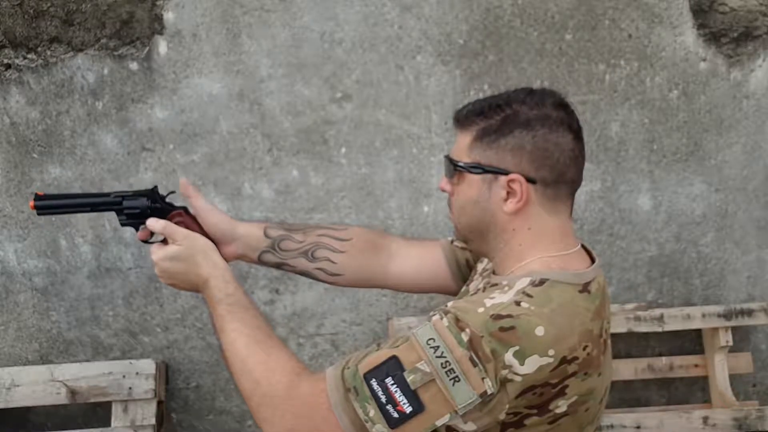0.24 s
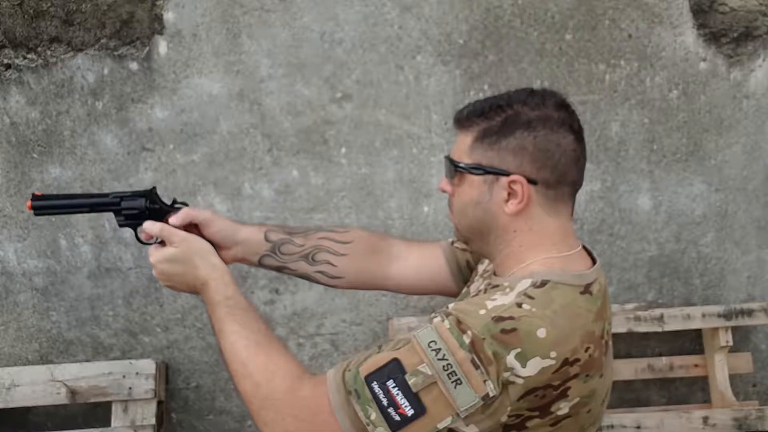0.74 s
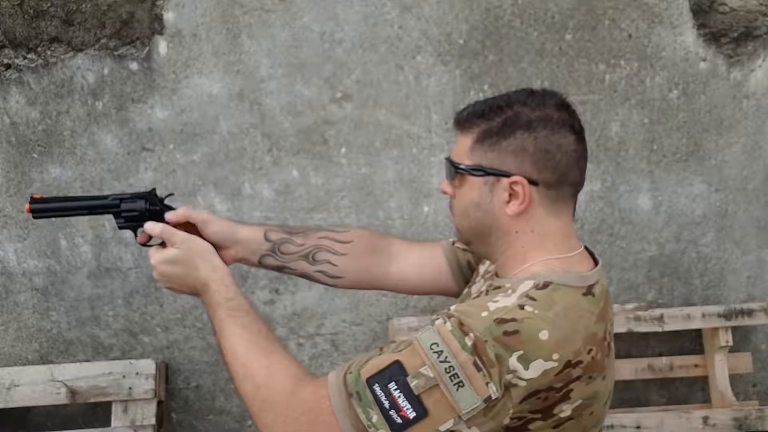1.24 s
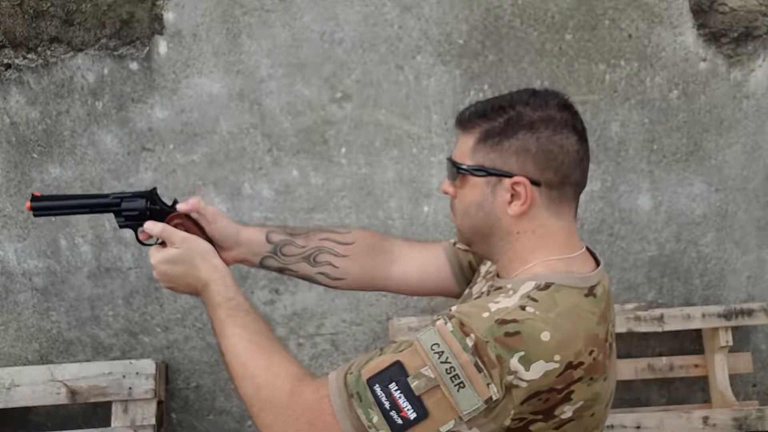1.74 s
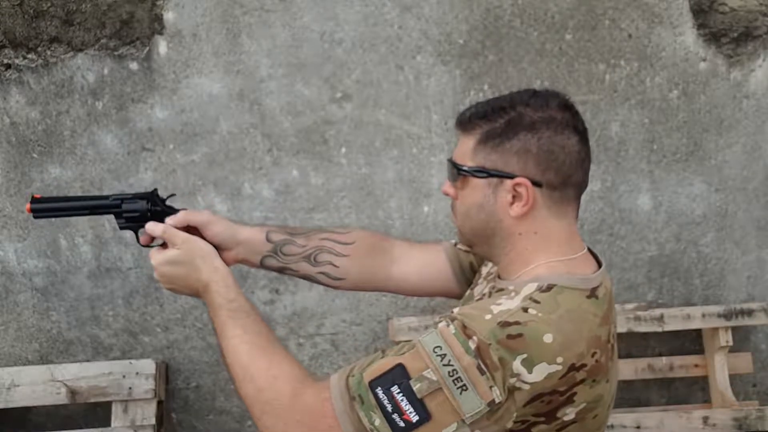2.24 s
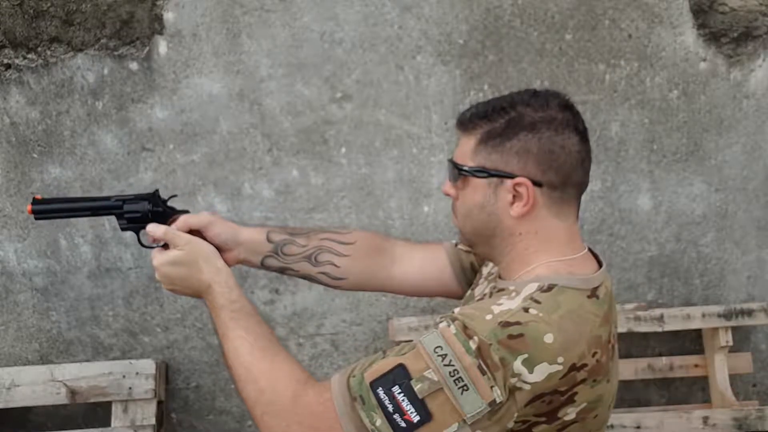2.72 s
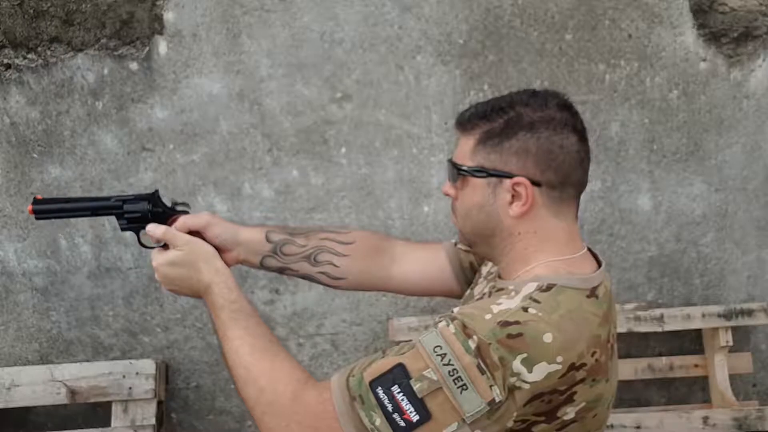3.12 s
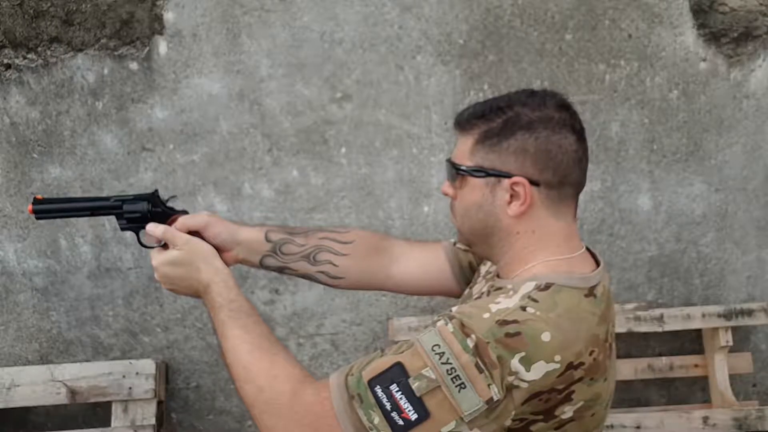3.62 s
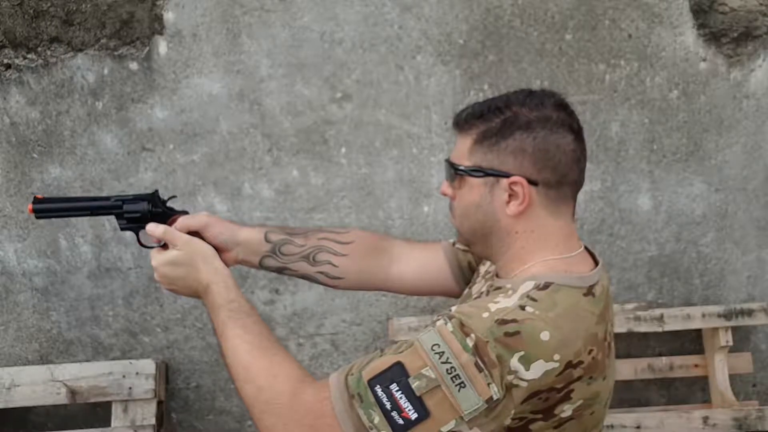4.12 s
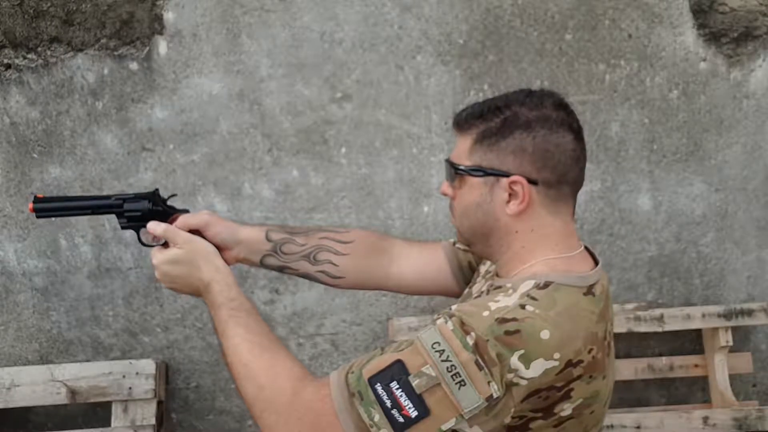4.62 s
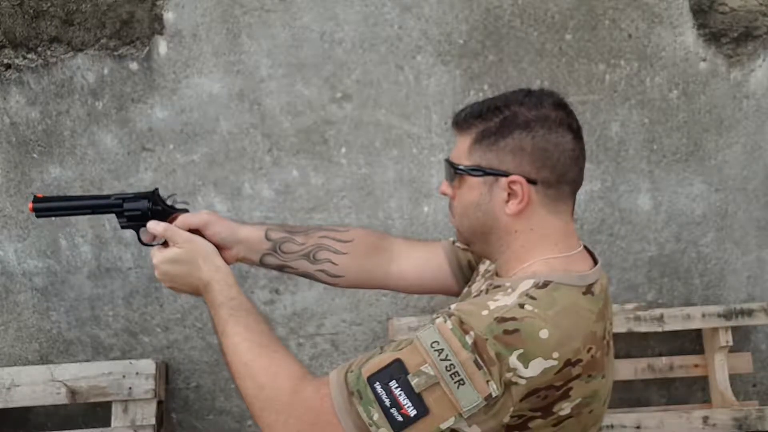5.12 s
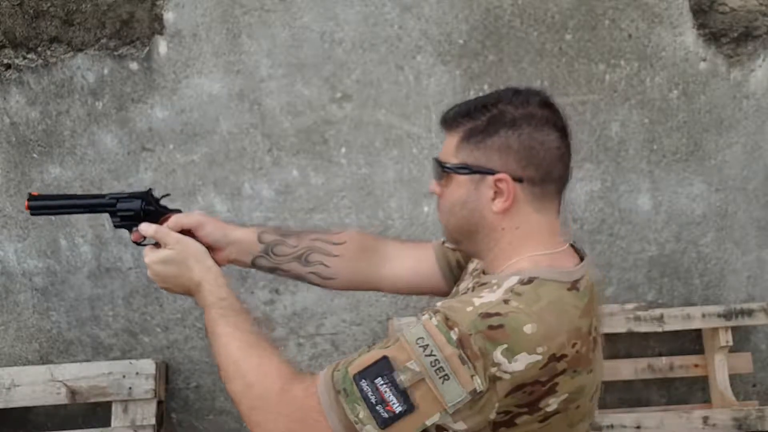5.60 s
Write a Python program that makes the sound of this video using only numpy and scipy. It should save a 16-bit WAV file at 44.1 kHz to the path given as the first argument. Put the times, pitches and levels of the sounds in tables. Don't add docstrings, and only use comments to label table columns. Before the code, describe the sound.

In a hard-walled yard, heard close in stereo, a shot's tail is already ringing as its pellet cracks on a hollow board at 0.01 s, the board rattling and humming; the spent pellet ticks on concrete. Steel clicks and a short slide at 0.35 s draw the hammer. Loaded gas shots snap at about 1.07, 2.06, 2.56 and 3.2 s, each followed roughly 0.09 s later by a woody board smack, some softer, the last strong. Small bounces follow at 1.25 and 2.26 s. Empty shots then come faster, at 3.65, 4.14, 4.53, 4.9 and 5.21 s: hammer crack, gas burst, ringing barrel and frame, short wall echoes, no board hit. Trigger take-up, cylinder lock and reset clicks fill the gaps until 5.37 s. Behind lie low distant traffic, a faint engine hum from 0.7 to 2 s, a lorry's rumble around 4.3 s and very faint cricket chirps after 5.5 s.

```python
import sys
import numpy as np
from scipy import signal
from scipy.fft import rfft, irfft, next_fast_len
from scipy.io import wavfile
from scipy.ndimage import uniform_filter1d

SR = 44100
rng = np.random.default_rng(int(sys.argv[2]) if len(sys.argv) > 2 else 0)


def level_to_linear(level):
    exponent = np.asarray(level, float) / 20
    return 10 ** exponent


def wav_out(sig):
    wavfile.write(sys.argv[1], SR, np.round(np.clip(np.atleast_2d(sig).T, -1, 1) * 32767).astype(np.int16))


N = 258426

LEAD = SR // 5
SIZE = next_fast_len(N + LEAD + SR)
HZ = np.maximum(np.arange(SIZE // 2 + 1) * SR / SIZE, 1)
TIME = (np.arange(SIZE) - LEAD) / SR

SHOT_START = [-.0775, 1.0716, 2.0617, 2.5570, 3.2019, 3.6545, 4.1409, 4.5309, 4.9041, 5.2139]
# crack_peak, muzzle_puff_peak, thump_peak, jet_db, room_db
SHOTS = [
    (0.46, 0.43, 0.18, -20.5, -4),
    (0.4, 0.52, 0.35, -25, -14.5),
    (0.42, 0.12, 0.41, -21.5, -14.5),
    (0.17, 0.27, 0.63, -17, -15.5),
    (0.25, .56, 0.23, -14, -17),
    (0.35, .0, 0.11, -19.5, -18.5),
    (0.24, 0.019, 0.13, -16, -18),
    (0.31, 0.034, 0.18, -12.5, -16),
    (0.57, 0, 0.14, -15, -16),
    (0.36, 0.05, 0.16, -14, -15.5),
]
# freq_hz, level_db [dB per Hz]
JET = [(88, -31), (150, -10), (244, 0), (837, -8.5), (960, -8), (1360, -10.5), (1480, -10), (2180, -5.5),
       (3040, -8.5), (5150, -8.5), (9260, -9), (13400, -9), (16000, -14.5)]
# freq_hz, gain_db
PELLET_TAIL = [(100, -6), (250, -6), (400, -1.5), (680, -7.5), (1100, -0.5), (2000, 1), (8000, 0),
               (16000, 1)]
# freq_hz, loaded_db, empty_db, t60_s
BARREL = [(362, -20, -42, .09), (470, -23.5, -33.5, 0.089), (596, -39, -29.5, .12), (807, -34.5, -34, 0.13),
          (1102, -27, -32.5, 0.22), (1380, -33.5, -31, 0.077), (1595, -37, -31, 0.12),
          (1710, -23.5, -35, .08), (2080, -22, -32, .07), (2093, -32, -21.5, 0.11), (3800, -23, -36, 0.052),
          (5230, -31, -29.5, 0.064), (6360, -30, -34, .08)]
# freq_hz, level_db, t60_s
FRAME = [(261, -31, 0.25), (492, -35.5, 0.11), (658, -30.5, 0.08), (963, -23, 0.091), (4030, -24.5, 0.037),
         (5300, -27, 0.063), (6250, -38.5, 0.041), (7420, -24.5, 0.11), (10580, -32, 0.072),
         (10960, -31.5, 0.035), (13000, -29, .1), (13600, -32, .08)]
# delay_ms, level_db
GROUND = (6.6, -2.5)
# delay_ms, level_db
WALLS = [(12.2, -11), (31.8, -14), (33.2, -13), (34.6, -14), (58.0, -20)]
# freq_hz, t60_s
YARD_T60 = [(100, 0.74), (260, 0.3), (700, 0.27), (1840, 0.29), (4850, 0.25), (12800, 0.15)]
# freq_hz, correlation [-1 to 1]
LIKENESS = [(30, 1), (120, 0.96), (290, 0.93), (640, 0.41), (1400, -.15), (3000, -0.031)]

HIT_START = [.0131, 1.1615, 2.1551, 2.6473, 3.2926]
# crack_peak, blow_db, first_modes_db, second_modes_db, panel_modes_db
HITS = [
    (1, -11.5, -13.5, -9, -12),
    (0.39, -13.5, -24.5, -13, -19),
    (0.26, -14.5, -17.5, -14, -16),
    (0.77, -16, -39, -25.5, -16),
    (0.96, -16.5, -18, -21, -14.5),
]
# freq_hz, level_db [dB per Hz]
RATTLE = [(120, -32), (250, -8), (420, -3.5), (790, -2), (1120, -3), (1630, -7), (1940, -4.5),
          (4670, -12.5), (7400, -15), (8900, -21.5), (12000, -26), (16000, -28)]
# freq_hz, level_db, t60_s
BOARD = [(189.5, 2.5, .25), (185.2, -7.5, 0.51), (232.4, 4.5, 0.15), (132, -5, 0.32), (340.1, -7.5, 0.32),
         (372, -7, 0.25), (453.7, -7, 0.21), (649, -10.5, 0.21), (1090, -5.5, .2), (1120, -9, .18),
         (794, -1.5, 0.26), (843, -5, .15)]

# start_s, dull_db, bright_db, top_db, length_ms
BOUNCES = [
    (.054, -25.5, -28.5, -34.5, 3.0),
    (.11, -58, -34, -46, 3.2),
    (1.254, -60, -36.5, -40, 1.3),
    (2.263, -67.5, -39, -42.5, 1.7),
]
# start_s, level_db, brightness_db
TICKS = [(0.0211, -15, -3.5), (0.3, -54, -4), (0.3262, -45.5, -3), (0.5422, -58, -5.5), (0.6134, -67.5, -3),
         (.715, -63.5, -0.5), (1.4492, -47.5, -7), (1.676, -68.5, -12), (1.938, -43.5, 1.5),
         (1.954, -47, 4.5), (2.4901, -53.5, -9), (3.136, -47, -3.5), (4.322, -48, -5.5),
         (4.4756, -43.5, -8.5), (4.8196, -47.5, -2), (5.63, -72.5, -4)]
# take_up_s, hand_s, cylinder_lock_s
PULL_TIMES = [(.3383, .3565, .374), (1.46, 1.478, 1.496), (2.466, 2.486, 2.514), (3.0988, 3.1232, 3.152),
              (3.5694, 3.5922, 3.6094), (4.068, 4.0868, 4.106), (4.4385, 4.4615, 4.483),
              (4.8091, 4.838, 4.857), (5.1498, 5.1667, 5.184)]
# effort_db, take_up_db [over effort], lock_db [over effort]
PULL_LEVELS = [(1.5, 4.5, 2), (-0.5, 4, 3), (-3, 1, -2.5), (-8.5, 1.5, -0.5), (-4, -2, 3),
               (-4.5, -0.5, 6.5), (-0.5, -0.5, 1), (-1, -2, 5.5), (-1, 4, 7.5)]
# start_s, level_db, brightness_db
SEARS = [
    (1.052, -11.5, -8.5),
    (2.045, -6, -3.5),
    (2.5414, 2.5, 5.5),
    (3.1859, -3.5, 2),
    (3.6392, -4, -2),
    (4.1224, -3.5, 1.5),
    (4.5149, 4, 2),
    (4.8874, 3.5, -2.5),
]
# second_click_s, level_db, first_click_db [over second]
RESETS = [(3.8344, -3.5, -9), (4.3178, -2.5, -3), (4.6893, 0, -3), (5.05, 0.5, -5), (5.3696, 1, -3.5)]
# freq_hz, level_db [dB per Hz]
STEEL_LOW = [(500, -27.5), (800, -11), (1000, -4), (1150, -11.5), (1500, -6), (2100, -3), (3500, -5),
             (4500, -35.5)]
# freq_hz, level_db [dB per Hz]
STEEL_HIGH = [(2800, -25.5), (4000, -2.5), (5500, -3.5), (7300, 5.5), (8200, -1), (9200, -3), (11000, -39)]
# freq_hz, level_db [dB per Hz]
STEEL_TOP = [(7000, -36), (9000, -0.5), (10500, -3.5), (13300, 1), (16000, -5), (18000, -15)]
# dull_db, bright_db, top_db
TAKE_UP, HAND, LOCK = (-53, -44, -51), (-39.5, -43, -38.5), (-36, -35, -38)
RESET, SEAR, TICK = (-41, -38.5, -41.5), (-39, -39, -42.5), (0, 0.97, -3)

# freq_hz, level_db [dB per Hz]
TRAFFIC = [(25, -26), (60, -5.5), (100, 0.5), (150, -0.5), (300, -5.5), (600, -10.5), (1000, -14),
           (2200, -26), (4000, -44.5), (8000, -46.5), (12500, -49.5), (14000, -65.5)]
# start_s, level_db
TRAFFIC_LEVEL = [(0, -51), (.45, -56), (.7, -54.5), (1.6, -55.5), (2.5, -54), (3.1, -58), (3.6, -55.5),
                 (3.95, -57), (4.4, -54.5), (5.0, -51), (5.5, -53), (5.65, -51.5), (5.86, -51.5)]
# start_s, pitch_hz, level_db
ENGINE = [
    (.5, 86, -79),
    (.7, 90.2, -60),
    (1.0, 95, -61),
    (1.3, 95, -53),
    (1.45, 94.1, -61.5),
    (1.65, 92.8, -50.5),
    (1.9, 93.5, -59),
    (2.05, 97, -70),
]
# loudest_s, pitch_hz, level_db
CREAKS = [
    (1.93, 665, -60),
    (3.05, 601, -64),
    (3.07, 792, -67),
]
# loudest_s, level_db
CRICKET = [
    (5.53, -84),
    (5.591, -81),
    (5.71, -71),
    (5.83, -74),
]
# freq_hz, gain_db
MICROPHONE = [(20, -16.5), (60, -14), (120, 0), (8000, 2.5), (8900, -4.5), (10000, 1), (15700, 4),
              (16300, -29), (18000, -39)]

LOADED = 5
SAME_YARD = .7
GUN_LAG_MS, BOARD_LAG_MS = 0.1904, 0.436
BOARD_LUMPY_DB, MIDDLE_DB = 4.5, -3
TOUCH_MS, TOUCH_DB, TOUCH_ROOM_DB, TOUCH_LUMPY_DB = 1.4, 11, -4, 6
RESET_GAP_MS = 29.5
SEAR_SLIP_MS, SEAR_SLIP_DB = 4.3, -9
SLIDE_DB, SLIDE_LEAD_MS, SLIDE_TAIL_MS, SLIDE_SWELL_DB = -64, 13, 30, -3
RUMBLE_DB, LORRY_S, LORRY_WIDTH_S, LORRY_DB = -71, 4.3, 0.8, 9
CREAK_RISE_S, CREAK_FALL_S, CREAK_EDGE_DB = .05, .11, -10.5
CRICKET_HZ, CHIRP_RISE_S, CHIRP_FALL_S, CHIRP_EDGE_DB = 6610, .025, .03, -4
CRICKET_FLUTTER_HZ, CRICKET_FLUTTER_DB = 40, 2.5


def rms_one(x):
    return x / np.sqrt(np.mean(np.abs(x) ** 2) + 1e-30)


def at_hz(points, hz):
    table = np.array(points)
    return np.interp(np.log(hz), np.log(table[:, 0]), table[:, 1])


def colour(spectrum):
    cepstrum = irfft(np.log(level_to_linear(at_hz(spectrum, HZ))), SIZE)
    cepstrum[1:SIZE // 2] *= 2
    cepstrum[SIZE // 2 + 1:] = 0
    return rms_one(np.exp(rfft(cepstrum)))


def delay(ms):
    return np.exp(-2j * np.pi * HZ * ms / 1000)


def train(times, shapes):
    out = np.zeros(np.shape(shapes[0])[:-1] + (SIZE,))
    for s, shape in zip(times, shapes):
        i = LEAD + round(s * SR)
        out[..., i:i + shape.shape[-1]] += shape
    return rfft(out)


def pulse(width_ms, after_ms=0.):
    ms = np.arange(SR * 12 // 1000) * 1000 / SR
    phase = (ms - after_ms) / width_ms + .5
    return np.sin(np.pi * np.clip(phase, 0, 1))


def burst(rise_ms, fall_ms, grain_db):
    ms = np.arange(SR // 8) * 1000 / SR
    grains = rng.standard_normal(len(ms)) * level_to_linear(grain_db * rng.standard_normal(len(ms)))
    return rms_one(grains) * (1 - np.exp(-ms / rise_ms)) * np.exp(-ms / fall_ms)


def diffuse(count):
    mid, side = rfft(rng.standard_normal((2, count)))
    hz = np.maximum(np.arange(count // 2 + 1) * SR / count, 1)
    alike = np.clip(at_hz(LIKENESS, hz), -1, 1)
    return np.sqrt((1 + alike) / 2) * mid + np.sqrt((1 - alike) / 2) * side * [[1], [-1]]


def yard(onset_ms, stretch, late_db, lumpy_db):
    count = 2 ** 15
    noise, t, out = diffuse(count), np.arange(count) / SR, 0
    octave = np.log2(np.maximum(np.arange(count // 2 + 1) * SR / count, 1))
    for centre in np.arange(6, 15):
        band = irfft(noise * np.clip(1 - abs(octave - centre), 0, 1), count)
        t60 = stretch * at_hz(YARD_T60, 2. ** centre)
        far_walls = level_to_linear(late_db - 60 * t / (2.89 * t60))
        out = out + band * (level_to_linear(-60 * t / t60) + far_walls)
    lumps = np.clip(rms_one(uniform_filter1d(rng.standard_normal(count), size=30)), -3, 1.8)
    out = out * (1 - np.exp(-t * 1000 / onset_ms)) * level_to_linear(lumpy_db * lumps * np.exp(-t / .08))
    return out / np.sqrt(np.mean(np.sum(out ** 2, axis=1)))


def ports(direct, lag_ms, left_db):
    return np.array([direct * delay(lag_ms) * level_to_linear(left_db), direct])


def barrel_ring(loaded):
    t = np.arange(SR // 4) / SR
    out = 0
    for (hz, loaded_db, empty_db, t60), chance in zip(BARREL, rng.standard_normal(len(BARREL))):
        level_db = loaded_db if loaded else empty_db
        out = out + level_to_linear(level_db + 1.5 * chance - 60 * t / t60) * np.sin(2 * np.pi * hz * t)
    return out


def frame_ring():
    t = np.arange(SR // 4) / SR
    out = 0
    for (hz, db, t60), (a, c) in zip(FRAME, rng.standard_normal((len(FRAME), 2))):
        decay = level_to_linear(db + 2.0 * a - 60 * t / t60)
        out = out + decay * np.sin(2 * np.pi * hz * (1 + 0.004 * c) * t + 2 * c)
    return out


def shots():
    s = np.array(SHOT_START)
    crack, puff, thump, jet_db, room_db = np.transpose(SHOTS)
    crack_shape = 1.5 * pulse(.14, 1) - .4 * pulse(.5, 1.4)
    puff_shape = -.9 * pulse(.25, 2.05) + .6 * pulse(.2, 2.9) - pulse(.55, 3.85)
    thump_shape = .3 * pulse(1.6, 2.8) + pulse(2.4, 5.2) - .5 * pulse(4, 8.4)
    pulses = train(s - .001, [a * crack_shape + b * puff_shape for a, b in zip(crack, puff)])
    thumps = train(s - .001, [c * thump_shape for c in thump])

    leak = train(s - .0024, [level_to_linear(db - 3) * burst(3.4, 2.2, 2.) for db in jet_db])
    main_jet = train(s, [level_to_linear(db + 9.5) * burst(2.8, 3.8, 2.7) for db in jet_db])
    jet = (main_jet + leak) * colour(JET)
    ring = train(s, [frame_ring() + barrel_ring(k < LOADED) for k in range(len(s))])

    same, *own = [yard(0.72, 1.306, -29.0, 6.1) for _ in range(len(s) + 1)]
    tails = []
    for db, fresh in zip(room_db, own):
        tails.append(level_to_linear(db + 27.5) * (np.sqrt(SAME_YARD) * same + np.sqrt(1 - SAME_YARD) * fresh))
    loaded_tails = train(s[:LOADED], tails[:LOADED]) * colour(PELLET_TAIL)
    wet = (loaded_tails + train(s[LOADED:], tails[LOADED:])) * colour(JET)

    ground = 1 + level_to_linear(GROUND[1]) * delay(GROUND[0])
    walls = 1 + sum(level_to_linear(db) * delay(ms) for ms, db in WALLS)
    direct = (pulses * ground + jet + ring) * walls
    low = thumps * (1 + level_to_linear(-7) * (walls - 1))
    return ports(direct, GUN_LAG_MS, -3.7) + ports(low, 1.6 * GUN_LAG_MS, -2.5) + wet


def board_ring(first_db, second_db, panel_db, middle_db):
    t = np.arange(SR // 2) / SR
    chance = rng.standard_normal((len(BOARD), 3))
    gains = [first_db] * 2 + [second_db] * 2 + [middle_db] * 6 + [panel_db] * 2
    out = 0
    for (hz, db, t60), gain_db, (a, b, c) in zip(BOARD, gains, chance):
        build = 1 - np.exp(-t / (0.022 * (190 / hz) ** 3))
        decay = level_to_linear(gain_db + db + 1.5 * a - 60 * t / t60)
        out = out + decay * build * np.sin(2 * np.pi * hz * (1 + b / 200) * t + 2 * c)
    return out


def hits():
    s = np.array(HIT_START)
    crack, blow_db, *ring_db = np.transpose(HITS)
    crack_shape = -pulse(.2, 1) + .6 * pulse(.2, 1.22)
    cracks = train(s - .001, [a * crack_shape for a in crack])
    stand = colour(RATTLE)
    rattle = train(s, [level_to_linear(db + 5.5) * burst(0.52, 11.0, 7.0) for db in blow_db]) * stand
    ring = train(s, [board_ring(*row) for row in np.transpose(ring_db + [blow_db + MIDDLE_DB])])
    ring = ring * (1 + level_to_linear(-11.5) * delay(23.) + level_to_linear(-5.5) * delay(49.))
    wet = train(s, [level_to_linear(db + 28) * yard(11.0, 1.0, -20.5, BOARD_LUMPY_DB) for db in blow_db]) * stand
    return ports(cracks + rattle + ring, BOARD_LAG_MS, -2.9) + wet


def touch(s, kind, db, bright_db=0):
    dull, bright, top = kind
    return s, dull + db - bright_db, bright + db + bright_db / 2, top + db + bright_db, TOUCH_MS


def contacts():
    rows = list(BOUNCES)
    for (take_s, hand_s, lock_s), (db, take_db, lock_db) in zip(PULL_TIMES, PULL_LEVELS):
        rows.append(touch(take_s, TAKE_UP, db + take_db))
        rows.append(touch(hand_s, HAND, db))
        rows.append(touch(lock_s, LOCK, db + lock_db))
    for s, db, first_db in RESETS:
        rows.append(touch(s - RESET_GAP_MS / 1000, RESET, db + first_db))
        rows.append(touch(s, RESET, db))
    for s, db, bright_db in SEARS:
        rows.append(touch(s, SEAR, db, bright_db))
        rows.append(touch(s + SEAR_SLIP_MS / 1000, SEAR, db + SEAR_SLIP_DB))
    return rows + [touch(s, TICK, db, bright_db) for s, db, bright_db in TICKS]


def sliding():
    gain = 0
    for (take_s, _, lock_s), (effort_db, *_) in zip(PULL_TIMES, PULL_LEVELS):
        ends_s = [take_s - SLIDE_LEAD_MS / 1000, lock_s + SLIDE_TAIL_MS / 1000]
        start_db = SLIDE_DB + effort_db
        gain = gain + level_to_linear(np.interp(TIME, ends_s, [start_db, start_db + SLIDE_SWELL_DB],
                                    left=-200, right=-200))
    return gain


def lockwork():
    s, *part_db, length_ms = np.transpose(contacts())
    taps = []
    for ms in length_ms:
        tap = burst(0.25 * max(ms, .3), max(ms, .3), 3.2)
        taps.append(tap * np.sqrt(ms * SR / 3500 / np.sum(tap ** 2)))
    grains = rng.standard_normal(SIZE) * level_to_linear(3.8 * rng.standard_normal(SIZE))
    slide = rfft(sliding() * rms_one(grains))
    steel, knock = 0, 0
    for dbs, spectrum, slide_db in zip(part_db, [STEEL_LOW, STEEL_HIGH, STEEL_TOP], [-8, -5, -5]):
        clusters = train(s - .0003, [level_to_linear(db + TOUCH_DB) * tap for db, tap in zip(dbs, taps)])
        tint = colour(spectrum)
        steel = steel + (clusters + level_to_linear(slide_db) * slide) * tint
        knock = knock + train(s, level_to_linear(dbs + TOUCH_ROOM_DB + 23.5)[:, None]) * tint
    wet = knock * rfft(yard(2.1, 0.84, -19.0, TOUCH_LUMPY_DB), SIZE)
    return ports(steel * (1 + level_to_linear(-17.0) * delay(GROUND[0])), GUN_LAG_MS, -4.0) + wet


def swell(s, hz, db, rise_s, fall_s, edge_db):
    return [(s - rise_s, hz, db + edge_db), (s, hz, db), (s + fall_s, hz, db + edge_db)]


def tone(rows, wobble_hz, wobble_db):
    s, hz, db = np.transpose(rows)
    r = np.exp(-2 * np.pi * wobble_hz / SR)
    flutter = rms_one(signal.lfilter([1], [1, -2 * r, r * r], rng.standard_normal(SIZE)))
    level = level_to_linear(np.interp(TIME, s, db, left=-200, right=db[-1] - 1.5) + wobble_db * flutter)
    level = level * (TIME < s[-1] + .05)
    phase = 2 * np.pi * np.cumsum(np.interp(TIME, s, hz)) / SR
    return np.sqrt(2) * level * np.sin(phase)


def background():
    noise = diffuse(SIZE)
    traffic_gain = level_to_linear(np.interp(TIME, *np.transpose(TRAFFIC_LEVEL)))
    traffic = rms_one(irfft(noise * colour(TRAFFIC), SIZE)) * traffic_gain
    rumble_db = RUMBLE_DB + LORRY_DB * np.exp(-((TIME - LORRY_S) / LORRY_WIDTH_S) ** 2)
    rumble = rms_one(irfft(noise / (1 + ((HZ - 55) / 16) ** 4), SIZE)) * level_to_linear(rumble_db)
    engine = tone(ENGINE, 3., 1.2)
    creaks = 0
    for row in CREAKS:
        creaks = creaks + tone(swell(*row, CREAK_RISE_S, CREAK_FALL_S, CREAK_EDGE_DB), 15., 2.)
    chirps = []
    for s, db in CRICKET:
        chirps += swell(s, CRICKET_HZ, db, CHIRP_RISE_S, CHIRP_FALL_S, CHIRP_EDGE_DB)
    cricket = tone(chirps, CRICKET_FLUTTER_HZ, CRICKET_FLUTTER_DB) * level_to_linear(np.array([[1.5], [-1.5]]))
    return traffic + rumble + creaks + engine + cricket


def scene():
    near = (shots() + hits() + lockwork()) * colour(MICROPHONE) * level_to_linear(-3.0)
    return (irfft(near, SIZE) + background())[:, LEAD:LEAD + N]


def gain_control(x, limit_db, share, release_db, attack_ms):
    power = uniform_filter1d(np.max(x ** 2, axis=0), size=64, origin=31)
    level = 10 * np.log10(power + 1e-12)
    ramp = release_db * np.arange(N) / SR
    held = np.maximum.accumulate(level + ramp) - ramp
    r = np.exp(-1000 / (attack_ms * SR))
    cut_db = signal.lfilter([1 - r], [1, -r], share * np.maximum(held - limit_db, 0))
    return x * level_to_linear(-cut_db)


def top_cut(x):
    return signal.sosfilt(signal.butter(12, 16990, fs=SR, output="sos"), x)


def record(dry):
    levelled = gain_control(dry, limit_db=-10.5, share=0.24, release_db=123.5, attack_ms=1.5)
    mix = 0.85 * np.tanh(levelled / 0.98)
    return top_cut(mix)


dry = scene()
out = record(dry)
wav_out(out)
```